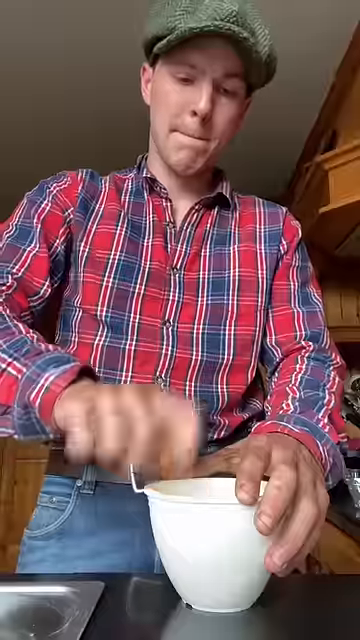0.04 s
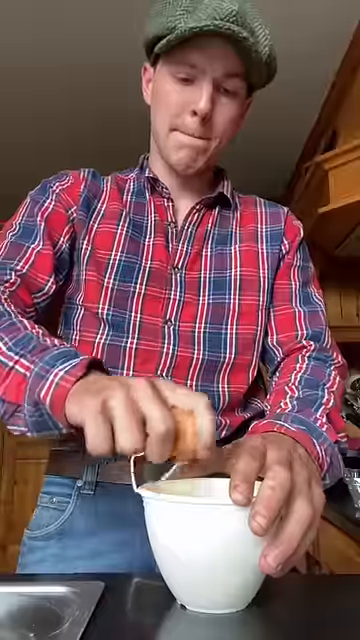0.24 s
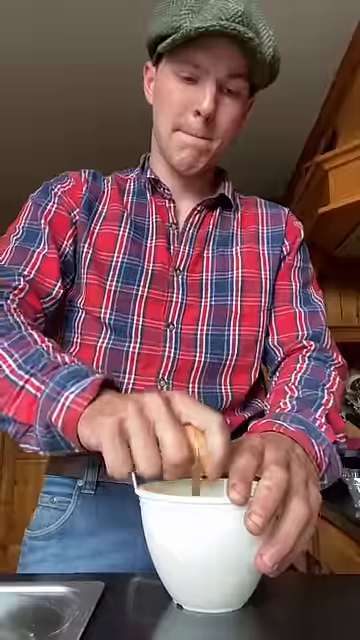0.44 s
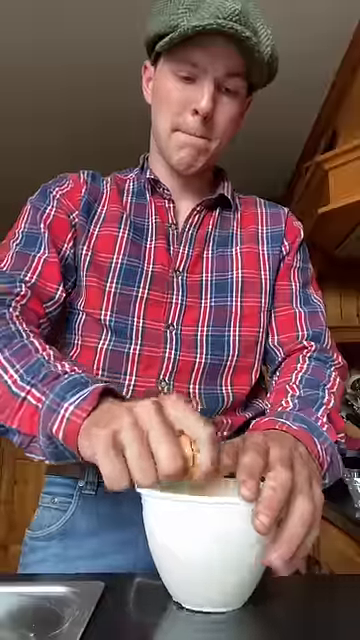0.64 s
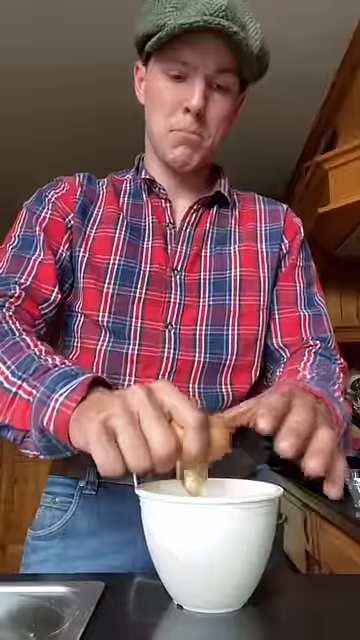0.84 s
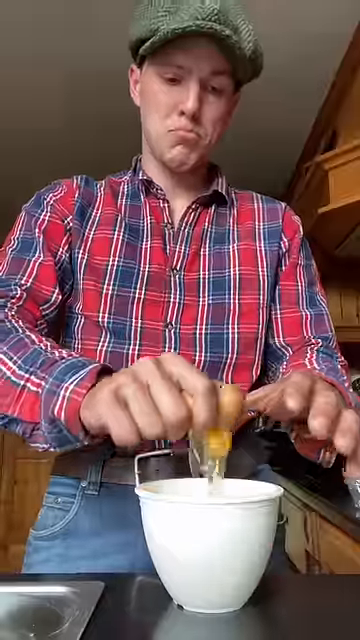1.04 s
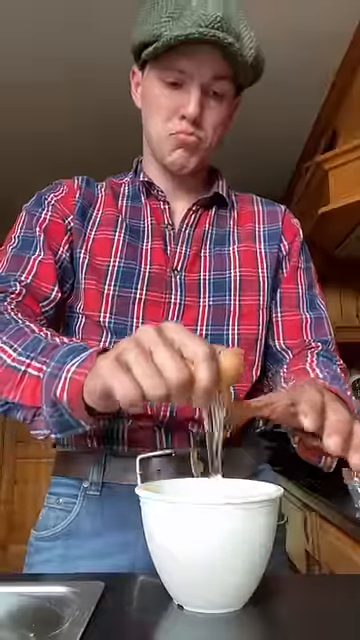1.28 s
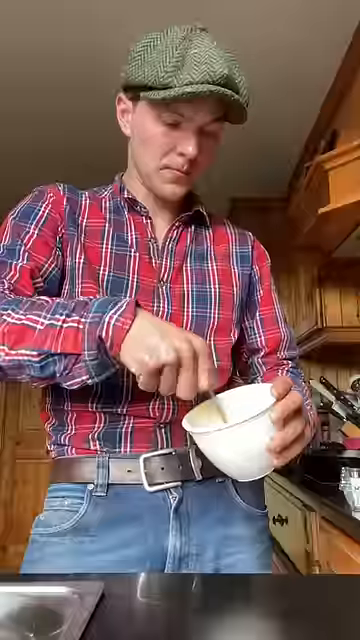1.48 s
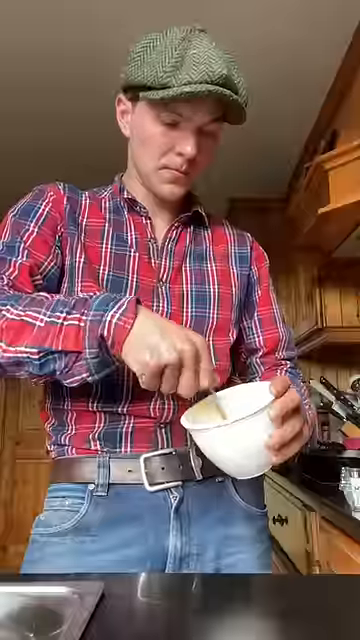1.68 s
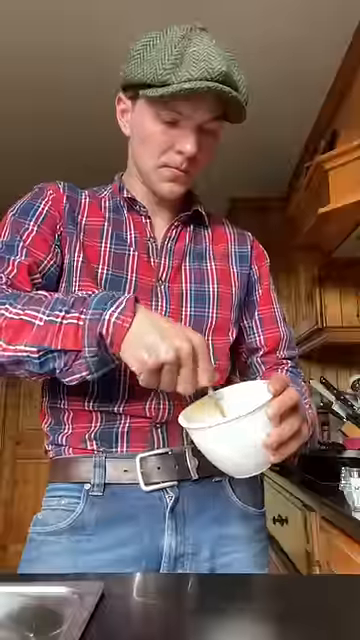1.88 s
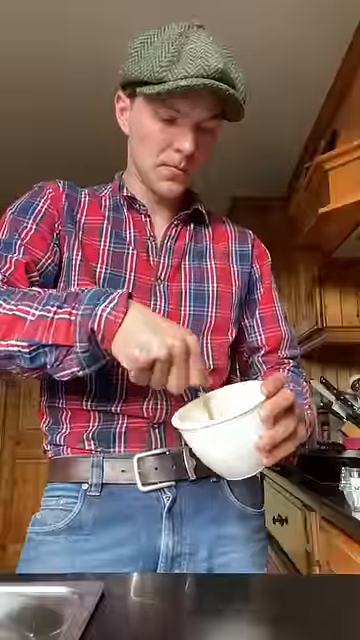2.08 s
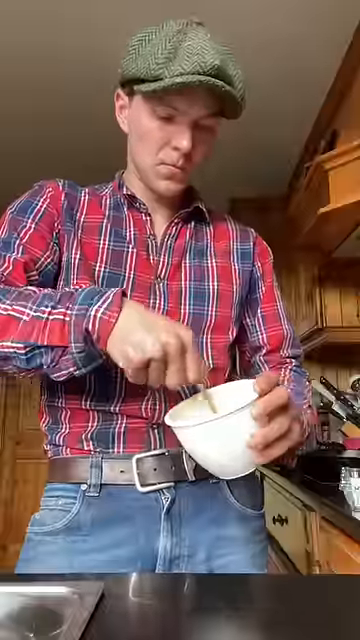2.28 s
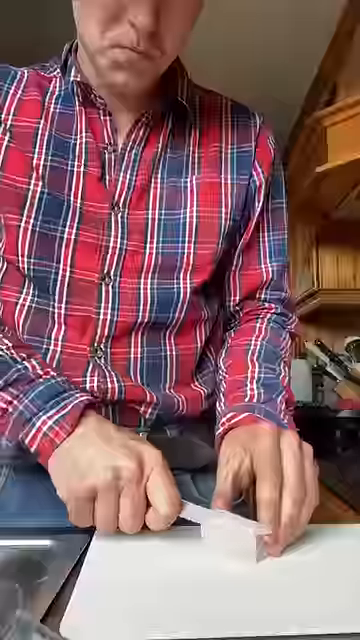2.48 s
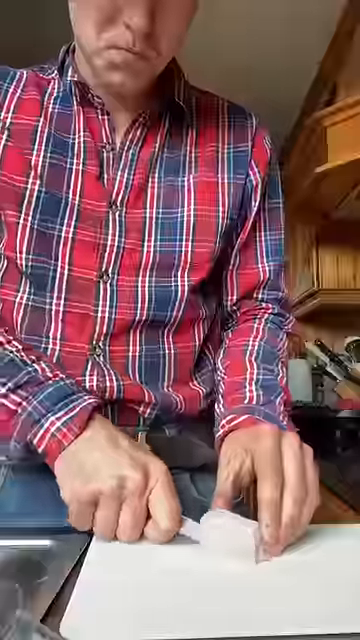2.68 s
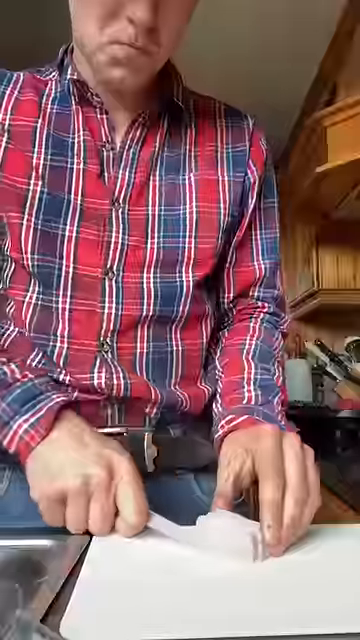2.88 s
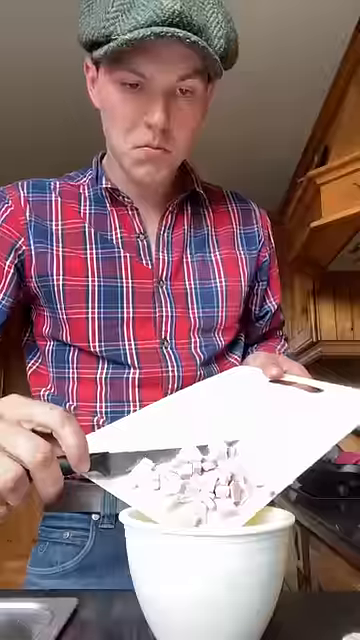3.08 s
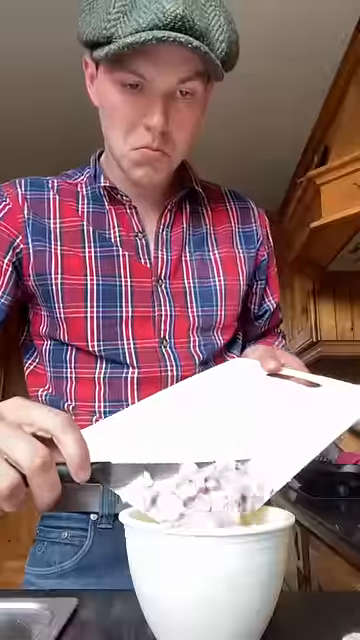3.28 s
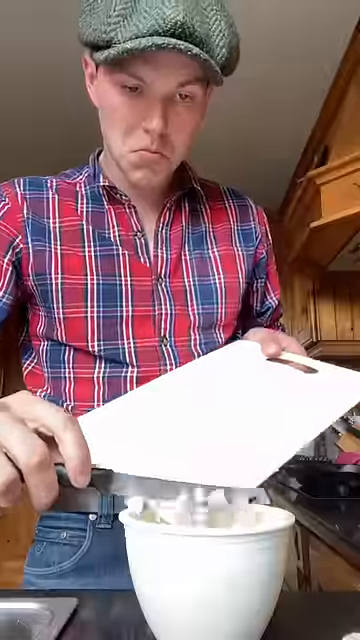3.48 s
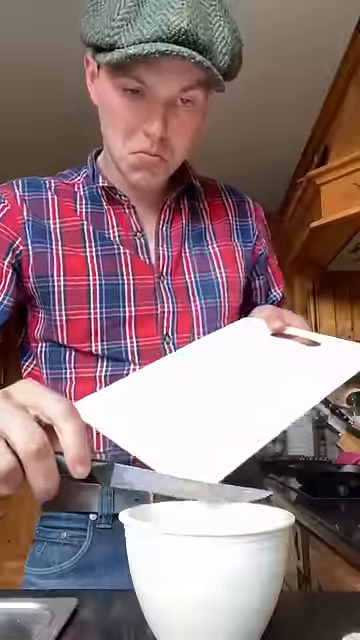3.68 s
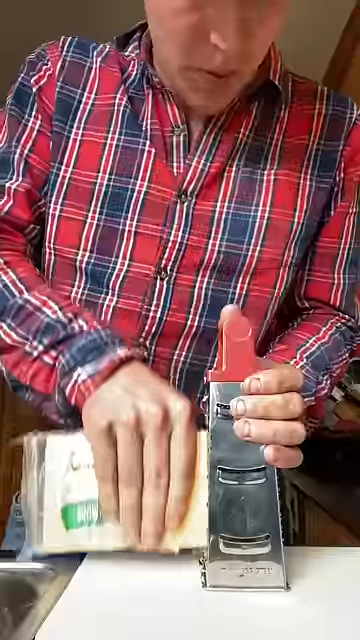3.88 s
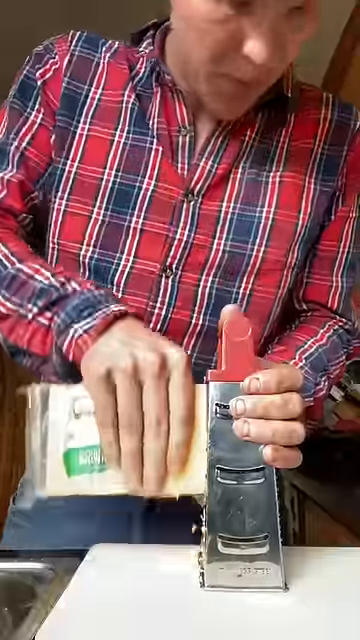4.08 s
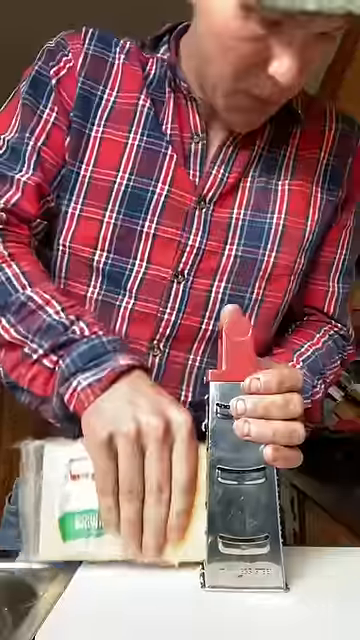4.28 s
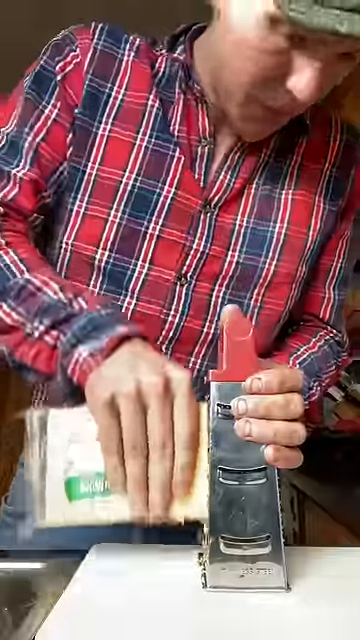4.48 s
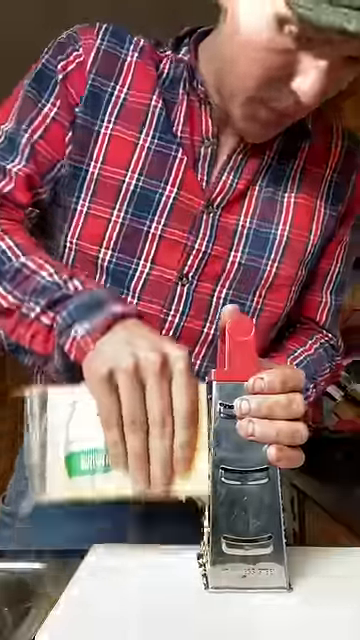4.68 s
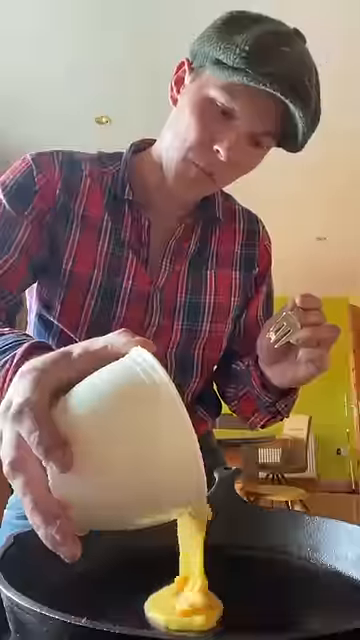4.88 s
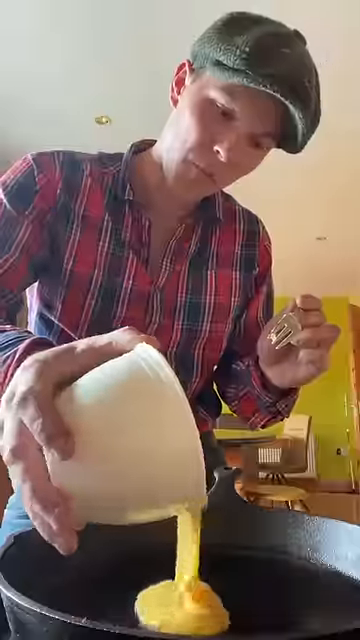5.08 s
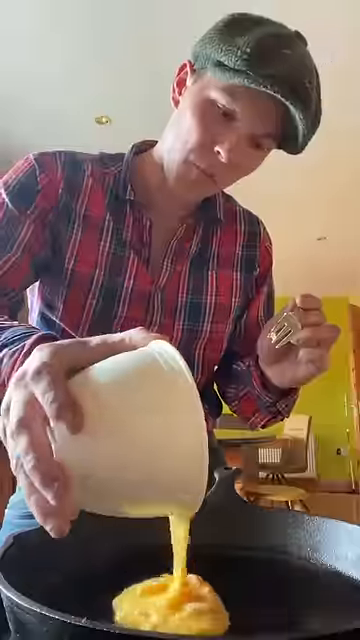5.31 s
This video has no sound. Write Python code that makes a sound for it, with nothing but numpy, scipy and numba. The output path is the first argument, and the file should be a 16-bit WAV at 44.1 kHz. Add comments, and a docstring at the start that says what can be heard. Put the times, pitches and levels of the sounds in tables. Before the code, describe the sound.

An egg is knocked on a plastic bowl and crunches open, a fork beats it, ham is sliced and scraped, cheese grated, egg sizzles in iron.

```python
"""An omelette in six short shots in a small live kitchen, over low hum and hiss; each cut chops the room's tail.
An egg is knocked on a plastic bowl (damped modes), its shell crunches (grains), a softer knock follows, then
snaps and wet plops; a fork beats it (ringing clicks, gliding gulps); ham is sliced and scraped off a board
(filtered grains, wavering resonances); cheese is rasped on a box grater in even strokes (torn grains, catches);
egg runs into a hot iron skillet (steam grains ringing the iron, bubble pings)."""
import sys
import numpy as np
from scipy import signal
from scipy.fft import rfft, irfft
from scipy.io import wavfile
from scipy.ndimage import uniform_filter1d, map_coordinates
from numba import njit

SR = 44100
rng = np.random.default_rng(int(sys.argv[2]) if len(sys.argv) > 2 else 0)


def digitize_waveform(pressure):
    """Quantize a signal to 16-bit integers and store it at the path in sys.argv[1].

    Rows of a 2-D input are taken as channels; values are limited to [-1, 1].
    """
    field = np.atleast_2d(pressure).T
    bounded = np.clip(field, -1, 1)
    quanta = np.round(bounded * 32767).astype(np.int16)
    wavfile.write(sys.argv[1], SR, quanta)


N = 235670
TIME = np.arange(N) / SR


def amp(db):
    """Decibels to gain."""
    return 10 ** (np.asarray(db) / 20)


def unit(x):
    """Scale to an rms of 1."""
    return x / np.sqrt(np.mean(x ** 2))


def add(out, start_s, sound, pan_db=0):
    """Mix a sound in at a time; pan_db is left minus right."""
    i = int(start_s * SR)
    panned = amp([[pan_db / 2], [-pan_db / 2]]) * sound
    out[:, i:i + sound.shape[-1]] += panned[:, :N - i]


def gesture(start_s, db, attack_s, hold_s, release_s):
    """Gain that peaks at start, holds and dies away; attack and release are the seconds for 20 dB."""
    before = np.maximum(start_s - TIME, 0) / attack_s
    after = np.maximum(TIME - start_s - hold_s, 0) / release_s
    return amp(db - 20 * (before + after))


def surges(rows, attack_s, release_s):
    """Body and treble gains of a run of overlapping swells; the strongest one leads at each moment."""
    body = [gesture(start, db, attack_s, hold, release_s) for start, hold, db, _ in rows]
    treble = [gesture(start, db, attack_s, hold, release_s) for start, hold, _, db in rows]
    return np.max(body, axis=0), np.max(treble, axis=0)


def wander(rate_hz):
    """Slow chance with a spread near 1: random points, rate_hz a second, joined by lines."""
    return 1.2 * np.interp(TIME * rate_hz, np.arange(4096), rng.standard_normal(4096))


def read_at(x, place):
    """Read each channel at fractional sample positions."""
    return np.array([map_coordinates(channel, [place], order=1, mode="mirror") for channel in x])


def waver(x, depth, rate_hz):
    """Let the pitch of a ringing sound drift by a share of itself."""
    return read_at(x, np.arange(N) + depth * np.cumsum(wander(rate_hz)))


def scatter(x, depth_s, rate_hz):
    """A tiny trembling delay blurs the steady lines of the room's tail into a wash."""
    return read_at(x, np.arange(N) + depth_s * SR * wander(rate_hz))


def colour(x, points, size=4096):
    """Causal minimum-phase filter with a (Hz, dB) response, built by folding the cepstrum."""
    hz, db = np.transpose(points)
    grid_hz = np.maximum(np.arange(size // 2 + 1) * SR / size, 1)
    cepstrum = irfft(np.log(amp(np.interp(np.log(grid_hz), np.log(hz), db))))
    cepstrum[1:size // 2] *= 2
    cepstrum[size // 2 + 1:] = 0
    impulse = irfft(np.exp(rfft(cepstrum)))
    return signal.fftconvolve(x, impulse[None], axes=1)[:, :x.shape[1]]


def resonate(x, peaks):
    """The sound plus the resonances that it excites."""
    ringing = 0
    for hz, width_hz, db in peaks:
        ringing = ringing + amp(db) * signal.lfilter(*signal.iirpeak(hz, hz / width_hz, SR), x)
    return x + ringing


def split(x, hz, kind, order=2):
    """Butterworth low or high part of a sound."""
    return signal.sosfilt(signal.butter(order, hz, kind, fs=SR, output="sos"), x)


def two_bands(x, split_hz, body_gain, treble_gain, order=2):
    """Play the body and the treble of a sound at their own levels."""
    body = unit(split(x, split_hz, "low", order))
    treble = unit(split(x, split_hz, "high", order))
    sign = (-1) ** (order // 2)  # keeps the bands in phase at the split
    return body * body_gain + sign * treble * treble_gain


def stereo(pair, width):
    """Left and right from a common part and an opposed part scaled by width."""
    return np.array([pair[0] + width * pair[1], pair[0] - width * pair[1]])


def noise(width, size=N):
    """Stereo white noise."""
    return stereo(rng.standard_normal((2, size)), width)


def grains(rate_hz, scatter_db, width):
    """Tiny clicks at random moments and places, most weak and a few strong."""
    strength = amp(scatter_db * np.minimum(rng.exponential(size=N), np.log(100)))
    clicks = (rng.random(N) < rate_hz / SR) * rng.choice([-1, 1], N) * strength
    return stereo([clicks, clicks * rng.standard_normal(N)], width)


def ring(modes, pitch_hz, rise_s, length=1, size=4096):
    """Damped modes; pitch_hz retunes the first and shifts the rest with it, length scales every t60."""
    t = TIME[:size]
    tone = np.zeros(size)
    for hz, db, t60 in modes:
        decay = amp(db - 60 * t / (t60 * length))
        tone += decay * np.sin(2 * np.pi * hz * pitch_hz / modes[0][0] * t)
    return tone * (1 - np.exp(-t / rise_s))


def ping(hz, cycles):
    """One small soft-edged ring that sinks by 1 / e in a few cycles."""
    turns = hz * TIME[:4096]
    return np.sin(2 * np.pi * turns) * np.exp(-turns / cycles) * (1 - np.exp(-2 * turns))


def pings(start_s, end_s, low_hz, high_hz, cycles, scatter_db, count):
    """A shower of small rings with random moment, pitch, strength and place; rms near 1 while it lasts."""
    out = np.zeros((2, N))
    for when, pitch, strength, place in rng.random((count, 4)):
        small = ping(low_hz * (high_hz / low_hz) ** pitch, cycles)
        level = amp(scatter_db * strength ** 2)
        add(out, start_s + when * (end_s - start_s), level * small, 10 * (place - .5))
    return unit(out) * np.sqrt((end_s - start_s) * SR / N)


def burst(tone, decay_s, width, size=4096):
    """A contact: a sharp, quickly dying cluster of micro-fractures, with rms 1 over its first 5 ms."""
    t = TIME[:size]
    envelope = np.exp(-t / decay_s) * (1 - np.exp(-t / (0.12 * decay_s)))
    x = colour(noise(width, size) * envelope, tone)
    return x / np.sqrt(np.mean(x[:, :SR // 200] ** 2))


def puffs(rows, tone, width):
    """Soft bursts that ring nothing; the decay constant is half the length."""
    out = np.zeros((2, N))
    for start, db, length in rows:
        add(out, start, amp(db) * burst(tone, length / 2, width))
    return out


# Bright spray spectrum. Each row: frequency in Hz, gain in dB.
SPLINTER_TONE = [(2000, -26), (5000, -3), (7000, -3), (10500, -7.5), (12500, -13), (15500, -14.5)]
STRIKE_SCATTER_DB = 3.5  # spread of each resonance from strike to strike


def taps(rows, modes, tone, peaks, clink_q, rise_s, width, pan_db):
    """Contacts click through the tool's resonances, spray treble and ring the vessel at their own pitches."""
    out = np.zeros((2, N))
    for start, click_db, ring_db, spray_db, ring_hz, clink_hz, clink_db, decay_s in rows:
        favoured = [(hz, band, db + STRIKE_SCATTER_DB * rng.standard_normal()) for hz, band, db in peaks]
        clink = (clink_hz, clink_hz / clink_q, clink_db)
        click = amp(click_db) * resonate(burst(tone, decay_s, width), favoured + [clink])
        spray = amp(spray_db) * burst(SPLINTER_TONE, 1.7 * decay_s, width)
        vessel = amp(ring_db) * ring(modes, ring_hz, rise_s)
        add(out, start, click + spray + vessel, pan_db)
    return out


# Hum spectrum. Each row: frequency in Hz, gain in dB.
HUM_TONE = [(25, -32), (48, 3), (75, -5.5), (110, -7), (150, -21), (300, -24), (900, -40.5)]


def hum():
    """Low-coloured noise and a steady 99.5 Hz tone, rms 1."""
    rumble = unit(colour(noise(.04), HUM_TONE))
    return unit(rumble + amp(2.0) * np.sin(2 * np.pi * 99.5 * TIME))


# Hiss spectrum. Each row: frequency in Hz, gain in dB.
HISS_TONE = [(100, -3), (500, 1), (1200, -12), (4000, -8), (10000, -22.5), (15000, -42.5)]


def hiss():
    """Wide coloured background noise, rms 1."""
    return unit(colour(noise(1.0), HISS_TONE))


def kitchen(t60_low_s, t60_high_s, size=32768):
    """Diffuse tail of the room, unrelated left and right; the treble dies first."""
    t = TIME[:size]
    air = rng.standard_normal((2, size))
    low = split(air, 4500, "low") * np.exp(-np.log(1000) * t / t60_low_s)
    high = split(air, 4500, "high") * np.exp(-np.log(1000) * t / t60_high_s)
    tail = (low - high) * (1 - np.exp(-t / 0.00067))
    tone = [(60, -13.0), (300, 4.0), (750, -2.0), (1300, 1.0), (3000, 2.0), (6000, 3.5), (12000, 3.5)]
    return unit(colour(tail, tone)) / np.sqrt(size)


# Echoes of hard blows: first row knock, second row fork.
# Each row: start in seconds, level in dB, pitch in Hz, length in seconds, left minus right in dB.
BLOW_ECHOES = [(0.800, -27.5, 780, 0.029, -13), (2.381, -29, 832, 0.022, -14)]


def blow_echo(row):
    """Soft echo of a hard blow returning from the room, off to the right: a sine under a smooth hump."""
    start, db, hz, length, pan_db = BLOW_ECHOES[row]
    t, out = TIME[:4096], np.zeros((2, N))
    envelope = np.sin(np.pi * np.minimum(t / length, 1)) ** 2
    add(out, start, amp(db) * np.sin(2 * np.pi * hz * t) * envelope, pan_db)
    return out


# Blade in meat, spectrum. Each row: frequency in Hz, gain in dB.
SLICE_TONE = [(500, -16.5), (2000, -2), (6000, -1), (10000, -1), (13000, 2.5), (15500, -5.5)]
# Blade pressed on the board, spectrum. Each row: frequency in Hz, gain in dB.
PRESS_TONE = [(25, -26), (60, -16), (200, -4.5), (564, -10), (816, -22.5), (2000, -31.5), (4400, -100)]
# Low thud spectrum, also of the rocking grater. Each row: frequency in Hz, gain in dB.
THUD_TONE = [(20, -19), (45, -7.5), (72, 4.5), (105, 1), (150, -9), (300, -13), (900, -71)]


def slice_ham():
    """The blade hisses through the meat, meets the board and is drawn along it."""
    cut = gesture(2.738, db=-55, attack_s=0.041, hold_s=0.029, release_s=0.015)
    draw = gesture(2.96, db=-60.0, attack_s=0.19, hold_s=0.045, release_s=.02)
    press = gesture(2.852, db=-45.0, attack_s=0.0077, hold_s=0.0082, release_s=0.16)
    weight = gesture(2.9, db=-52, attack_s=0.03, hold_s=0.11, release_s=0.03)
    rumble = unit(colour(noise(0.014), THUD_TONE)) * weight
    blade = unit(colour(grains(7600, 3.1, 0.24), SLICE_TONE)) * (cut + draw)
    return blade + unit(colour(grains(750, 0.87, 0.14), PRESS_TONE)) * press + rumble


# Knife pushing ham. Each row: start in seconds, hold in seconds, body in dB, treble in dB.
PUSHES = [(3.078, .04, -53, -64), (3.132, 0.043, -42, -57), (3.195, 0.089, -43.5, -56.5),
          (3.297, 0.093, -41, -45), (3.408, 0.014, -36, -41.5), (3.47, 0.065, -43.5, -42),
          (3.6, 0.12, -55, -89)]
# Blade ticking on the board. Each row: start in seconds, level in dB, length in seconds.
TICKS = [(3.652, -49.5, 0.02), (3.760, -58, 0.02)]
# Diced ham dropping into the bowl. Each row: start in seconds, level in dB, pitch in Hz.
DICE = [(3.168, -35, 406), (3.328, -27.5, 550), (3.410, -29, 626), (3.512, -37, 1220)]
# Board resonances. Each row: frequency in Hz, width in Hz, gain in dB.
BOARD = [(263, 45, 13.5), (416, 30, 15.5), (572, 80, 11), (800, 51, 7), (1300, 64, 5.5), (3190, 320, 3.5)]
# Scraping edge, spectrum. Each row: frequency in Hz, gain in dB.
SCRAPE_TONE = [(35, -48), (60, -25), (192, -10), (417, -9), (536, -7.5), (1190, -10.5), (1500, -22),
               (1720, -24.5), (3330, -33.5), (14000, -56)]
# Tick and grater tooth, spectrum. Each row: frequency in Hz, gain in dB.
TOOTH_TONE = [(150, 5.5), (500, 12.5), (1500, 0.5), (2500, 5), (4200, 2.5), (6000, -3), (9000, -5)]
PUSH_ATTACK_S, PUSH_RELEASE_S, DICE_CYCLES = 0.047, 0.064, 3


def scrape_board():
    """The edge sticks and slips on the plastic board, whose notes shift; diced ham tumbles into the bowl."""
    slips = colour(grains(1100, 2, 0.061), SCRAPE_TONE)
    board = waver(resonate(slips, BOARD) - slips, depth=.035, rate_hz=14)
    body, treble = surges(PUSHES, PUSH_ATTACK_S, PUSH_RELEASE_S)
    out = two_bands(slips + board, 1650, body, treble, order=4) + puffs(TICKS, TOOTH_TONE, 0.71)
    shower = pings(3.07, 3.4, low_hz=229, high_hz=1025, cycles=DICE_CYCLES, scatter_db=20, count=70)
    out += amp(-10.5) * body * shower
    for start, db, hz in DICE:
        add(out, start, amp(db) * ping(hz, DICE_CYCLES))
    return out


# Grater rocking on the counter. Each row: start in seconds, level in dB.
ROCKS = [(3.996, -41), (4.198, -50), (4.287, -45.5), (4.334, -38.5), (4.56, -44), (4.656, -42.5)]
# Cheese bumping the grater's face. Each row: start in seconds, level in dB, pitch in Hz.
BUMPS = [(4.316, -31, 580), (4.319, -33, 337), (4.461, -36, 520), (4.594, -34, 494), (4.640, -30.5, 460)]


def rock_grater():
    """Thudding noise as the grater rocks on the counter, and short low rings as the cheese bumps its face."""
    sway = sum(gesture(start, db, attack_s=0.024, hold_s=0.0016, release_s=0.074) for start, db in ROCKS)
    out = unit(colour(noise(0.012), THUD_TONE)) * sway
    for start, db, hz in BUMPS:
        add(out, start, amp(db) * ping(hz, cycles=2.8))
    return out


# Cheese catching on the grater. Each row: start in seconds, click in dB, body ring in dB, rasp in dB,
# body in Hz, tooth in Hz, tooth ring in dB, click decay constant in seconds.
CATCHES = [(3.9898, -52, -37, -49.5, 830, 2310, 4, .006), (4.0018, -34, -28, -47, 784, 1400, -2, 0.0037),
           (4.0382, -42, -70, -63, 810, 2100, 15, .005), (4.1061, -53.5, -59, -72, 780, 2860, 18.5, 0.007),
           (4.1415, -44, -39, -46, 796, 1850, 3, 0.0088), (4.157, -41, -29.5, -48.5, 782, 4400, 4, 0.0074),
           (4.3, -48.5, -53, -55, 796, 1430, 19.5, 0.016),
           (4.3161, -32.5, -32.5, -57, 780, 4130, -6, 0.0077),
           (4.3425, -37, -42, -41, 796, 2720, 0, 0.0055), (4.3715, -41, -46, -43, 743, 2090, 9, 0.0046),
           (4.4588, -57, -40.5, -48, 820, 1350, 1, 0.0062),
           (4.4885, -36.5, -43, -34, 1200, 4400, 4, 0.0042),
           (4.5935, -50, -39.5, -46.5, 816, 3250, 9, .006),
           (4.640, -40.5, -42, -37.5, 798, 6100, 10.5, 0.0047),
           (4.7486, -47.5, -63, -60, 800, 2800, 14, 0.0099)]
# Grater body modes. Each row: nominal frequency in Hz, level in dB, t60 in seconds.
GRATER = [(788, 3.5, 0.053), (1227, 0, 0.038), (548, -5, 0.046), (462, -1.5, 0.029), (1597, -7.5, 0.027)]
# Grater wall resonances. Each row: frequency in Hz, width in Hz, nominal gain in dB.
GRATER_WALL = [(1370, 50, 0), (1876, 28, -1), (3930, 23, -1), (5860, 130, 0)]
# Rasp spectrum. Each row: frequency in Hz, gain in dB.
RASP_TONE = [(100, -18), (450, 1), (800, 4), (1000, -4), (1300, 2.5), (2000, -1.5), (4000, 3.5), (7000, -2),
             (11000, -3.5), (13500, -45)]
FIRST_BITE_S, STROKE_S = 4.0, 0.1535
BITE_BODY_DB, EASE_BODY_DB = -46.5, 20  # level at the bite, drop halfway to the next
BITE_TREBLE_DB, EASE_TREBLE_DB = -51.5, 13.5


def grate_cheese():
    """Stroke by stroke the teeth tear the cheese in jerks and shake the steel box; catches knock it."""
    strokes = (TIME - FIRST_BITE_S) / STROKE_S
    ease = np.abs(2 * ((strokes + .5) % 1) - 1)  # 0 at a bite, 1 halfway to the next
    body = amp(BITE_BODY_DB - EASE_BODY_DB * ease)
    treble = amp(BITE_TREBLE_DB - EASE_TREBLE_DB * ease)
    jerks = amp(5 * wander(rate_hz=90))
    teeth = resonate(colour(grains(800, 2.6, 0.29) * jerks, RASP_TONE), GRATER_WALL)
    rasp = two_bands(teeth, 1940, body, treble)
    shower = pings(3.99, 4.76, low_hz=319, high_hz=1340, cycles=2.2, scatter_db=11, count=110)
    shreds = amp(-4) * body * shower
    catches = taps(CATCHES, GRATER, TOOTH_TONE, GRATER_WALL, clink_q=4.2, rise_s=0.00094, width=0.2, pan_db=2.0)
    return rasp + shreds + rock_grater() + catches


# Air pockets behind the fork. Each row: start in seconds, level in dB, starting pitch in Hz,
# glide in shares per second (the pitch moves at twice this), decay constant in seconds.
GULPS = [(1.672, -19.5, 504, 5.5, 0.005), (1.77, -39, 558, 0.5, 0.011), (1.869, -19, 600, 2, 0.0054),
         (1.945, -26.5, 550, 0.5, 0.009), (2.07, -35, 590, 2, 0.0076), (2.148, -34, 540, 0, .009),
         (2.18, -28.5, 406, 1.5, 0.0079), (2.364, -39, 403, -2, 0.019), (2.55, -41, 487, -16, 0.0029)]


def gulp_air():
    """Air pockets sound as short sines that glide in pitch."""
    t, out = TIME[:4096], np.zeros((2, N))
    for start, db, hz, glide, decay_s in GULPS:
        tone = np.sin(2 * np.pi * hz * t * (1 + glide * t))
        add(out, start, amp(db) * tone * np.exp(-t / decay_s) * (1 - np.exp(-t / 0.0033)))
    return out


# Fork against the bowl. Each row: start in seconds, click in dB, bowl ring in dB, splash in dB,
# bowl in Hz, tine in Hz, tine ring in dB, click decay constant in seconds.
FORK = [(1.636, -38, -33, -55, 843, 2250, -18, 0.01), (1.6725, -40, -25, -51, 860, 1640, 13, 0.01),
        (1.7701, -39.5, -40, -45, 860, 3320, 11.5, 0.0051), (1.823, -38, -39, -51.5, 800, 2650, 12, 0.0055),
        (1.833, -40, -34.5, -54, 830, 3300, 11, 0.0054),
        (1.8669, -32.5, -19.5, -45, 841, 1650, 18.5, 0.0036),
        (1.944, -35.5, -32.5, -39, 923, 2840, 2, .006), (2.0233, -43.5, -45, -66, 830, 2230, 12, 0.0054),
        (2.0712, -41.5, -34, -54, 830, 2160, 5, 0.0048), (2.15, -40, -43, -54, 836, 2130, 4, 0.015),
        (2.1772, -34.5, -31, -47.5, 865, 2000, 5.5, 0.0069), (2.36, -35.5, -20.5, -49, 822, 3800, 2, .005),
        (2.517, -47.5, -35.5, -56.5, 850, 2140, 20, 0.0084), (2.533, -52.5, -36, -70, 800, 2200, 20, .011),
        (2.5532, -35.5, -22, -51, 800, 2560, -13, .005)]
# Modes of the bowl with egg. Each row: nominal frequency in Hz, level in dB, t60 in seconds.
FULL_BOWL = [(851, 6.5, 0.034), (908, -9, 0.062), (790, -22, 0.053), (493, -5.5, 0.029), (417, -12, 0.02),
             (267, -11.5, 0.036), (1118, -8, 0.036), (1420, -18, 0.011), (2360, -21, 0.027)]
# Fork resonances. Each row: frequency in Hz, width in Hz, nominal gain in dB.
FORK_STEEL = [(1430, 55, 5), (1773, 39, 8), (2185, 65, 10.5), (2760, 130, -0.5), (3210, 150, -5.5),
              (3800, 230, -5.5)]
# Tine click, spectrum. Each row: frequency in Hz, gain in dB.
TINE_TONE = [(200, -4), (700, -1.5), (1250, -6.5), (2300, 2.5), (3700, 2.5), (4800, -5), (6000, -8),
             (8000, -47)]
# Stirred egg, spectrum. Each row: frequency in Hz, gain in dB.
STIR_TONE = [(120, -1), (450, 11), (850, 4), (1300, -4.5), (2400, 1.5), (3800, -3.5), (6000, -24),
             (12000, -61)]
WAKE_BELOW_CLICK_DB = 8.5


def beat_egg():
    """The fork clacks round the hand-held bowl and drags squelching egg after each stroke; air gulps."""
    motion = gesture(1.4, db=-56.5, attack_s=0.8, hold_s=0.93, release_s=0.82)
    for start, click_db, *_ in FORK:
        motion += gesture(start, click_db - WAKE_BELOW_CLICK_DB, attack_s=0.0058, hold_s=0.011, release_s=0.025)
    squelch = unit(colour(grains(700, 2.3, 0.33), STIR_TONE)) * motion
    clacks = taps(FORK, FULL_BOWL, TINE_TONE, FORK_STEEL, clink_q=15, rise_s=0.0032, width=0.091, pan_db=0.5)
    return squelch + gulp_air() + clacks + blow_echo(1)


# Steam pockets bursting. Each row: start in seconds, level in dB, length in seconds.
SPITS = [(4.854, -25, 0.018), (4.917, -33, 0.019), (5.055, -28, 0.022), (5.122, -29.5, 0.013),
         (5.266, -32.5, 0.021)]
# Steam burst spectrum. Each row: frequency in Hz, gain in dB.
STEAM_TONE = [(300, -33), (1200, -0.5), (2300, 10), (3200, -5.5), (10000, -12), (14000, -44)]
# Steam through a narrow gap, spectrum. Each row: frequency in Hz, gain in dB.
SQUEAL_TONE = [(7000, -28), (10700, 13), (12000, -18)]


def spit_steam():
    """Pockets of steam burst as soft puffs; one escapes through a narrow gap as a high squeal."""
    return puffs(SPITS, STEAM_TONE, 0.094) + puffs([(4.831, -31.5, 0.042)], SQUEAL_TONE, 0.24)


# Boiling surges. Each row: start in seconds, hold in seconds, body in dB, treble in dB (before the pan's gains).
BOILS = [(4.803, .02, -49, -39), (4.843, 0.049, -27.5, -44), (4.9, 0.033, -28.5, -41),
         (5.033, 0.024, -33.5, -37.5), (5.1, 0.17, -35.5, -40.5), (5.27, 0.048, -29.5, -43.5)]
# Bare iron resonances. Each row: frequency in Hz, width in Hz, gain in dB.
BARE_SKILLET = [(2687, 31, 14), (2810, 40, 12.1), (1750, 52, 3.8)]
# Resonances of the egg-covered iron. Each row: frequency in Hz, width in Hz, gain in dB.
COVERED_SKILLET = [(2390, 58, 7), (2670, 30, 7.5), (3920, 54, 5.5), (5600, 46, 8)]
# Sizzle spectrum. Each row: frequency in Hz, gain in dB.
SIZZLE_TONE = [(150, -63), (267, -24.5), (401, -15.5), (649, -23), (918, -13.5), (2060, -4), (2360, -2),
               (2600, -9), (10400, 1.5), (12900, -7), (15000, -105)]
BOIL_ATTACK_S, BOIL_RELEASE_S = 0.049, 0.095
LANDING_S, LANDING_RISE_S = 4.8, 0.0044  # the egg meets the iron


def fry_egg():
    """Water flashes to steam in thousands of tiny bursts that ring the iron; its notes change as egg covers it."""
    bursts = colour(grains(7000, 2.6, .55), SIZZLE_TONE)
    bare = resonate(bursts, BARE_SKILLET) - bursts
    loaded = resonate(bursts, COVERED_SKILLET) - bursts
    covered = np.interp(TIME, [4.93, 5.02], [0, 1])
    iron = waver((1 - covered) * bare + covered * loaded, depth=0.003, rate_hz=20) * amp([[3], [-3]])
    body, treble = surges(BOILS, BOIL_ATTACK_S, BOIL_RELEASE_S)
    boiling = two_bands(bursts + iron, 3870, body, treble)
    crackle = amp(-9) * treble * unit(colour(grains(260, 2.6, .55), SIZZLE_TONE))
    shower = pings(LANDING_S, 5.34, low_hz=2090, high_hz=3600, cycles=4.2, scatter_db=14, count=110)
    bubbles = amp(-11) * body * shower
    landed = np.clip((TIME - LANDING_S) / LANDING_RISE_S, .25, 1)  # the hot fat already ticks over
    pan = landed * (boiling + crackle + bubbles + spit_steam())
    return pan * np.array([[.9], [-.8]]) if PAN_GAINS_ARE_DB is False else pan * amp([[.9], [-.8]])


PAN_GAINS_ARE_DB = True  # left and right in dB


# Hands shifting on the bowl. Each row: start in seconds, level in dB.
GRIPS = [(0.01, -39), (0.915, -43.5)]
# Handling spectrum. Each row: frequency in Hz, gain in dB.
HANDLING_TONE = [(24, -28.5), (40, -15.5), (248, -5.5), (400, -14.5), (735, -13.5), (1170, -25.5),
                 (2810, -27), (10000, -64)]


def handle_bowl():
    """Grains of rubbing as the hands shift on the bowl."""
    hands = sum(gesture(start, db, attack_s=.07, hold_s=0.0038, release_s=0.15) for start, db in GRIPS)
    return unit(colour(grains(3700, 1.1, 0.62), HANDLING_TONE)) * hands


# Thumbs crushing the shell. Each row: start in seconds, level in dB, hold in seconds.
SQUEEZES = [(0.454, -50.5, 0.014), (0.484, -33.5, 0.0081), (0.56, -40.5, .02), (0.588, -37, 0.017),
            (0.636, -46.5, 0.012), (0.665, -43.5, 0.051)]
# Shell snapping. Each row: start in seconds, click in dB, bowl ring in dB, splinter in dB,
# bowl in Hz, shell in Hz, shell ring in dB, click decay constant in seconds.
SNAPS = [(0.4848, -39, -39.5, -48, 700, 3680, 5, 0.0035), (0.5034, -40, -55, -38.5, 785, 3000, -1, .006),
         (0.6307, -40, -68.5, -33, 785, 3500, 0, 0.007), (0.664, -47, -62.5, -38, 785, 5000, 1.5, 0.0082),
         (0.8056, -41, -65.5, -36, 785, 6000, 2.5, .004),
         (0.8495, -32.5, -31, -32.5, 830, 4820, 14, 0.0037),
         (0.8774, -49.5, -55, -69, 785, 3300, 20, 0.0045), (1.3675, -36.5, -34, -55, 812, 3250, 2.5, 0.011)]
# Raw egg dropping into the bowl. Each row: start in seconds, level in dB, length in seconds.
PLOPS = [(1.108, -47.5, 0.043), (1.123, -44.5, 0.023), (1.256, -46.5, 0.031)]
# Empty bowl modes, also rung by the knocks. Each row: nominal frequency in Hz, level in dB, t60 in seconds.
EMPTY_BOWL = [(746, 1.5, 0.076), (793, -13, 0.055), (665, -35.5, .05), (490, -22.5, 0.035),
              (230, -29.5, 0.046), (1065, -18, 0.035), (1290, -22.5, 0.03), (1426, -24, 0.03),
              (2250, -29.5, 0.04)]
# Shell resonances. Each row: frequency in Hz, width in Hz, nominal gain in dB.
SHELL = [(3530, 450, -9.5), (4540, 560, -1.5)]
# Snap spectrum. Each row: frequency in Hz, gain in dB.
SNAP_TONE = [(200, -1), (1000, -0.5), (2000, 0), (3500, 3.5), (5200, -5.5), (7000, -5), (11000, -13.5)]
# Crunch spectrum. Each row: frequency in Hz, gain in dB.
CRUNCH_TONE = [(120, -46), (200, -13), (400, -5.5), (671, 3.5), (946, -14.5), (1850, -3), (11400, -6.5),
               (15000, -24)]
# Wet plop spectrum. Each row: frequency in Hz, gain in dB.
WET_TONE = [(200, -24), (500, -7.5), (950, 7), (1600, 0), (2300, 0.5), (4000, -8), (10000, -12.5)]
SQUEEZE_ATTACK_S, SQUEEZE_RELEASE_S = 0.0064, 0.052


def open_shell():
    """The shell crunches in grains of fracture and snaps, ringing the bowl; raw egg plops in."""
    thumbs = sum(gesture(start, db, SQUEEZE_ATTACK_S, hold, SQUEEZE_RELEASE_S) for start, db, hold in SQUEEZES)
    crunch = unit(colour(grains(1000, 2.6, 0.2), CRUNCH_TONE)) * thumbs
    snaps = taps(SNAPS, EMPTY_BOWL, SNAP_TONE, SHELL, clink_q=9, rise_s=0.0013, width=0.23, pan_db=-0.5)
    return crunch + puffs(PLOPS, WET_TONE, 0.14) + snaps


# Egg against the rim. Each row: start in seconds, ring in dB, rim in dB, crack in dB, splinter in dB, thump in dB,
# bowl in Hz, ring length as a share of the free ring, judder in dB, rattle in dB.
KNOCKS = [(0.1615, 16, 3.5, -9.5, -24.5, -14, 745, 0.47, -25, -19),
          (0.7774, -2.5, -18, -30.5, -62.5, -38.5, 759.5, 0.75, -23, -33.5)]
# Rim modes. Each row: frequency in Hz, level in dB, t60 in seconds.
RIM = [(1420, -2, 0.015), (2230, -0.5, 0.008), (2890, 0, 0.009), (4280, -3, 0.0033)]
# Counter modes. Each row: frequency in Hz, level in dB, t60 in seconds.
COUNTER = [(42, -1.5, 0.067), (72, -2, 0.078), (125, -4, 0.051), (185, 6, 0.025)]
# Shell crack spectrum. Each row: frequency in Hz, gain in dB.
CRACK_TONE = [(100, -10), (500, -3), (1400, -3.5), (3000, -7.5), (4300, -7.5), (6000, -26), (9000, -38.5)]
# Bowl juddering in the hand, spectrum. Each row: frequency in Hz, gain in dB.
JUDDER_TONE = [(100, -18), (250, -7.5), (360, -9.5), (490, -0.5), (600, -6.5), (900, -3), (1150, 1),
               (1450, -10), (1750, -23.5), (2500, -13.5), (8000, -54.5)]
# Bowl rattling on the counter, spectrum. Each row: frequency in Hz, gain in dB.
RATTLE_TONE = [(250, -35), (560, -24), (650, -1), (760, -1.5), (870, -3), (990, -29.5), (2500, -39.5)]
JUDDER_DECAY_S, RATTLE_DECAY_S = 0.017, 0.024


def knock_egg():
    """Each knock cracks the shell, rings rim and bowl, judders, rattles and thumps the counter."""
    out = np.zeros((2, N))
    lead_in = unit(colour(grains(5000, 1.5, .3), CRACK_TONE))  # grainy noise swelling briefly into the knock
    for (start, ring_db, rim_db, crack_db, splinter_db, thump_db,
         bowl_hz, length, judder_db, rattle_db) in KNOCKS:
        crack_s = start - .002  # the crack starts 2 ms before the ring
        out += lead_in * gesture(crack_s, crack_db - 11, attack_s=0.01, hold_s=0, release_s=.004)
        add(out, crack_s, amp(crack_db) * burst(CRACK_TONE, 0.012, 0.1))
        add(out, crack_s, amp(splinter_db) * burst(SPLINTER_TONE, .0025, .3))
        add(out, start - .0006, amp(rim_db) * ring(RIM, RIM[0][0], 0.00045), pan_db=2.0)
        add(out, start, amp(ring_db) * ring(EMPTY_BOWL, bowl_hz, 0.0043, length), pan_db=-3)
        add(out, start, amp(judder_db) * burst(JUDDER_TONE, JUDDER_DECAY_S, .15))
        rattle = burst(RATTLE_TONE, RATTLE_DECAY_S, 0.9, size=16384)  # blurs the bowl's note
        add(out, start + .005, amp(rattle_db) * rattle)
        add(out, start, amp(thump_db) * ring(COUNTER, COUNTER[0][0], 0.006))
    return out


def crack_egg():
    """A knock on the bowl, crunching shell, a second softer knock, then more snaps and wet plops."""
    return handle_bowl() + knock_egg() + open_shell() + blow_echo(0)


# Shot boundaries. Each entry: time in seconds.
CUTS = [0, 1.585, 2.564, 3.015, 3.988, 4.783, 5.4]
# Shots between cuts. Each row: room in dB, hum in dB, hiss in dB.
SHOTS = [(-7, -59.5, -67), (-5, -65.5, -88), (-6.5, -67.5, -61), (-1.5, -66, -84), (-4, -57.5, -55.5),
         (-7, -65, -62)]


def scene():
    """Each action sounds in the kitchen over hum and hiss, from one cut to the next."""
    room = kitchen(t60_low_s=0.53, t60_high_s=0.36)
    low_hum, background_hiss = hum(), hiss()
    actions = [crack_egg(), beat_egg(), slice_ham(), scrape_board(), grate_cheese(), fry_egg()]
    out = np.zeros((2, N))
    for action, start, end, (room_db, hum_db, hiss_db) in zip(actions, CUTS, CUTS[1:], SHOTS):
        tail = signal.fftconvolve(action, room, axes=1)[:, :N]
        wet = scatter(tail, depth_s=.000045, rate_hz=300) * amp(room_db)
        add(wet, .031, amp(-22.0) * action)  # a slap from the far wall
        on = uniform_filter1d(1. * ((TIME >= start) & (TIME < end)), size=128)
        out += on * (action + wet + amp(hum_db) * low_hum + amp(hiss_db) * background_hiss)
    return out


@njit
def follow(x, attack_s, release_s):
    """Level that rises fast and sinks slowly."""
    out, level = np.empty(len(x)), 0.
    for i in range(len(x)):
        level += (x[i] - level) / (SR * (attack_s if x[i] > level else release_s))
        out[i] = level
    return out


# Stereo width of closely spaced microphones. Each row: frequency in Hz, side gain in dB.
WIDTH = [(40, -25), (130, -11), (300, -11.5), (650, 1.5), (9000, -2.5), (13000, -4.5)]
TOP_HZ = 15800


def record(dry):
    """The gain ducks under the loudest knocks and creeps back; the bass is narrow, the top soft."""
    loudness = follow(np.abs(dry).max(axis=0), 0.0046, 0.14)
    ahead = np.roll(loudness, -64)  # look-ahead in samples
    left, right = dry * np.minimum(1, amp(-13.0) / (ahead + 1e-9))
    side = colour((left - right)[None] / 2, WIDTH)[0]
    pair = stereo([(left + right) / 2, side], 0.88)
    soft = colour(pair, [(1000, -0.5), (11000, -2.5), (12500, -6.5), (14000, -21.5)])
    return signal.sosfilt(signal.ellip(8, .2, 70, TOP_HZ, fs=SR, output="sos"), soft)


dry = scene()
out = record(dry)
digitize_waveform(out)
```